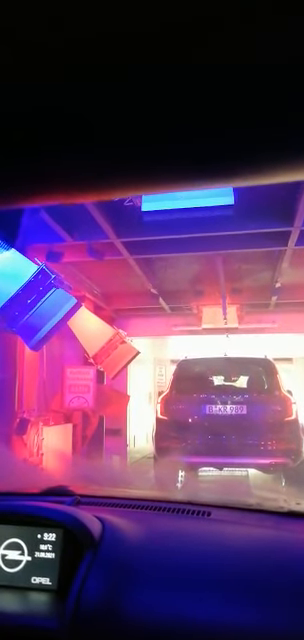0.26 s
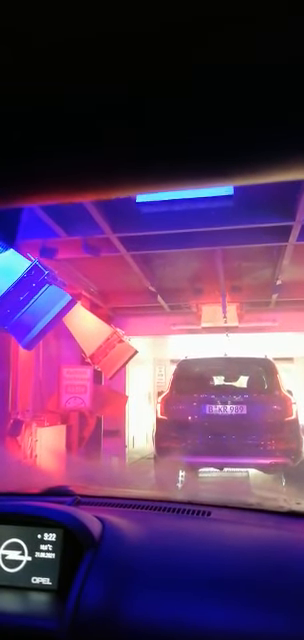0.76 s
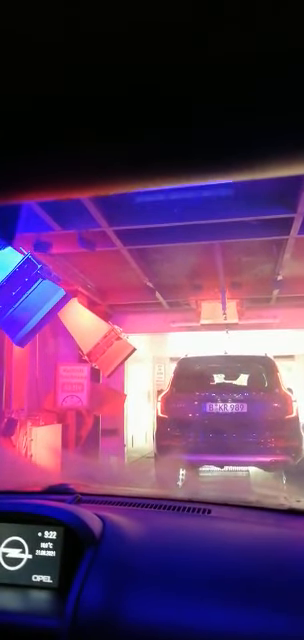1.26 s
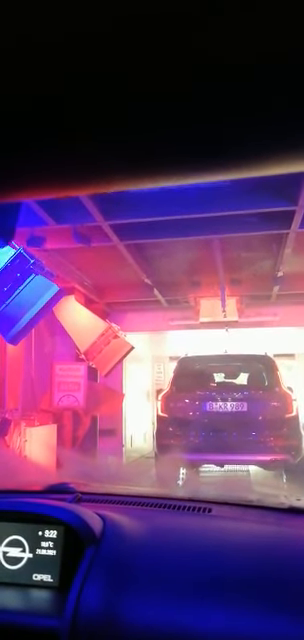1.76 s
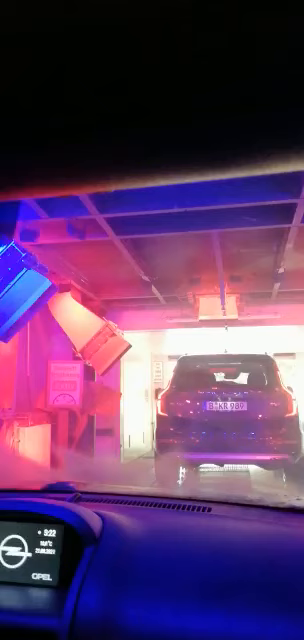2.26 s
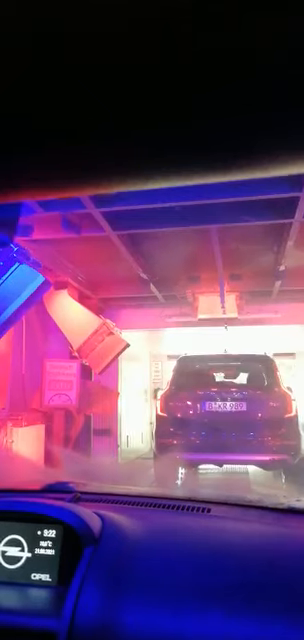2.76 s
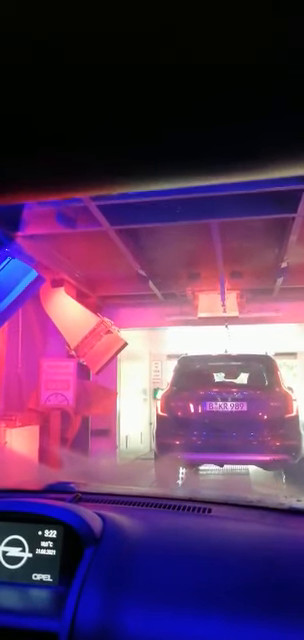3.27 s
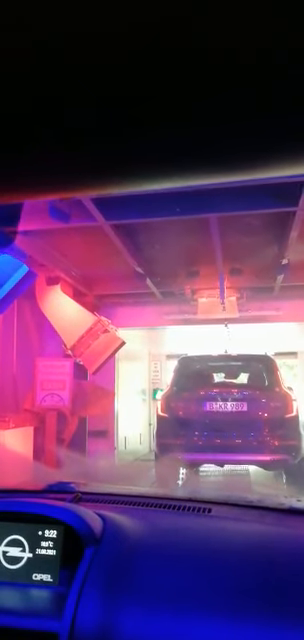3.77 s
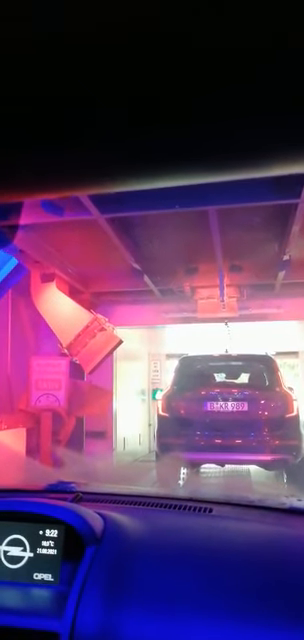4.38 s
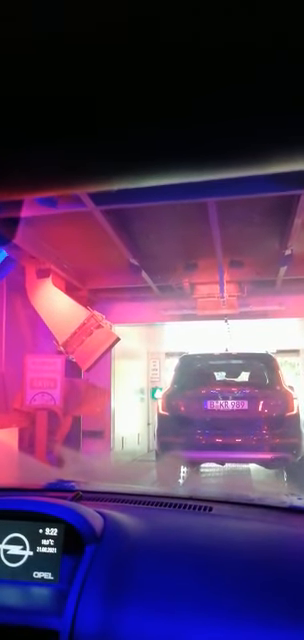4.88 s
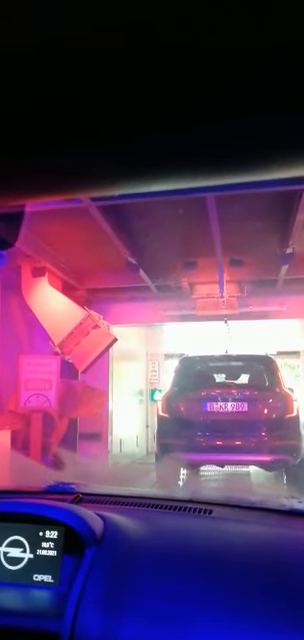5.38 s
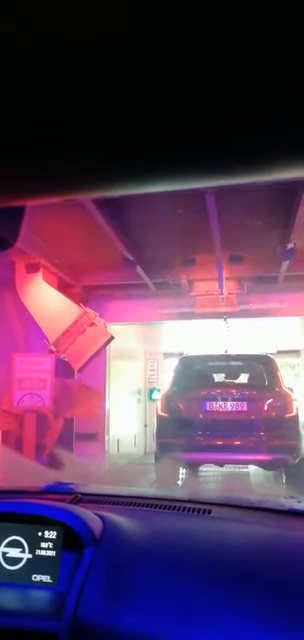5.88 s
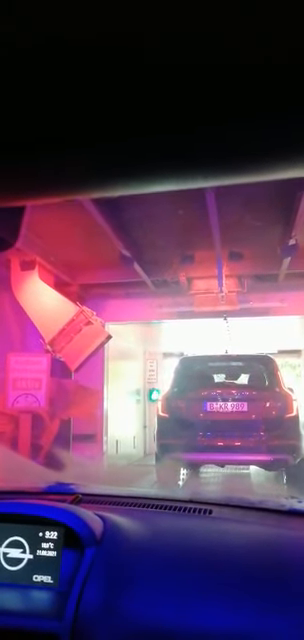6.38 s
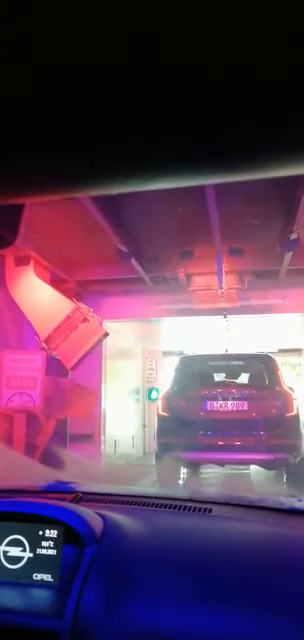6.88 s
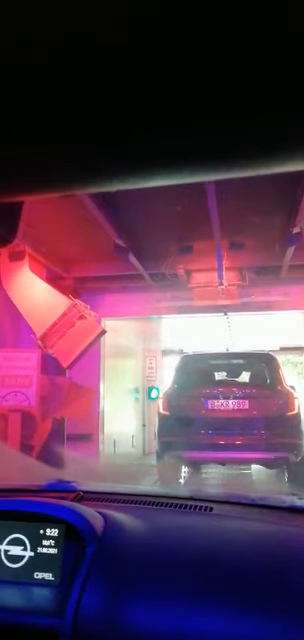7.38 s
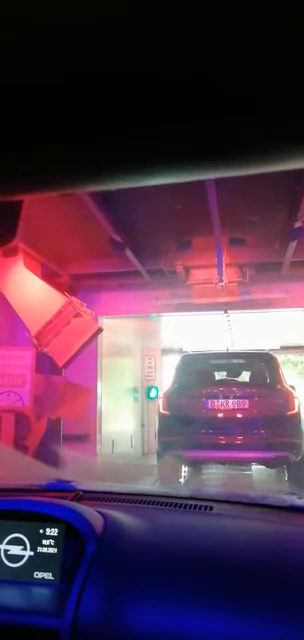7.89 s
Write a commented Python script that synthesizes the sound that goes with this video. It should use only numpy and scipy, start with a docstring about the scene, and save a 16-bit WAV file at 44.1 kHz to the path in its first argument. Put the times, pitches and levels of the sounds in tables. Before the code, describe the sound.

A dull, continuous rush of car wash blowers is heard from the cabin of a car creeping under the nozzles. A soft fan tone comes and goes as the air booms and drums ever harder on the panels, with hollow howls swelling and sinking. A quiet shower of bright ticks hits the windscreen midway, followed by a short, thin hiss of spray with airy whistling. The roar carries on throughout.

```python
"""Inside a car in a tunnel car wash, creeping under the nozzles of the dryer.
Big fans roar and hum through the closed windows. Their air jets howl on the bodywork,
buffet the panels more and more and make the cabin boom. Blown drops patter on the
windscreen and ring the glass, then a jet sweeps a sheet of fine spray across it,
hissing, sizzling and whistling."""
import sys
import numpy as np
from scipy import signal
from scipy.fft import rfft, irfft
from scipy.io import wavfile
from scipy.ndimage import uniform_filter1d, minimum_filter1d

SR = 44100
rng = np.random.default_rng(int(sys.argv[2]) if len(sys.argv) > 2 else 0)


def transcribe(signal):
    """Save signal, clipped to [-1, 1], as a 16-bit WAV file at the path in sys.argv[1]."""
    frames = np.atleast_2d(signal).T
    limited = np.clip(frames, -1, 1)
    pcm = np.round(limited * 32767).astype(np.int16)
    wavfile.write(sys.argv[1], SR, pcm)


N = 358091
TIME = np.arange(N) / SR


def gain_of(db):
    """Decibels as a gain."""
    return 10 ** (np.asarray(db) / 20)


def unit_rms(x):
    """Scales to rms 1."""
    return x / np.sqrt(np.mean(x ** 2) + 1e-20)


def summed_db(levels_db):
    """The level in dB of unrelated sounds heard at once."""
    return 10 * np.log10(sum(gain_of(db) ** 2 for db in levels_db) + 1e-20)


def swell(centre_s, db, half_s):
    """A bell-shaped fade; its half-length runs from the peak to half the gain."""
    return gain_of(db) * .5 ** (((TIME - centre_s) / half_s) ** 2)


def coloured(x, eq):
    """Shapes x with an EQ curve that rolls off steeply past its ends; rms 1."""
    eq_hz, eq_db = np.transpose(eq)
    hz = np.fft.rfftfreq(len(x), 1 / SR) + 1e-3
    roll_off = np.minimum(hz / eq_hz[0], 1) ** 2 * np.minimum(eq_hz[-1] / hz, 1) ** 2
    curve = gain_of(np.interp(np.log(hz), np.log(eq_hz), eq_db))
    return unit_rms(irfft(rfft(x) * roll_off * curve, len(x)))


def drift(rate_hz):
    """A slow random wobble, rms 1, up to about the given rate."""
    hz = np.fft.rfftfreq(N, 1 / SR)
    return unit_rms(irfft(rfft(rng.standard_normal(N)) * np.exp(-(hz / rate_hz) ** 2), N))


def flutter(depth_db, rate_hz):
    """A randomly wavering gain, rms 1."""
    return unit_rms(gain_of(depth_db * drift(rate_hz)))


def air(eq, gust_db, gust_hz):
    """Turbulent noise of one colour that flutters in strength."""
    return coloured(rng.standard_normal(N), eq) * flutter(gust_db, gust_hz)


def resonate(x, hz, width_hz):
    """A steady or gliding resonance: shift down to zero, smooth twice, shift back."""
    carrier = np.exp(2j * np.pi * np.cumsum(np.broadcast_to(hz, len(x))) / SR)
    pole = np.exp(-np.pi * width_hz / SR)
    smoothed = signal.lfilter([(1 - pole) ** 2], [1, -2 * pole, pole * pole], x / carrier)
    return unit_rms((carrier * smoothed).real)


def impacts(per_s, spread_db):
    """Random clicks of either sign, most of them small."""
    size = gain_of(spread_db * np.minimum(rng.exponential(1, N), 3))
    return size * rng.choice([-1, 1], N) * (rng.random(N) < per_s / SR)


# EQ for the dull roar through the glass and the thin hiss past the door seals.
# Each row: frequency in Hz, relative level in dB.
ROAR_EQ = [(60, -18.5), (130, -0.5), (210, -4.5), (270, -14.5), (370, -14), (560, -9), (800, -19),
           (1150, -25), (1600, -32.5), (2100, -38), (2700, -36.5), (3250, -40.5), (3750, -53), (4500, -71)]
SEAL_EQ = [(2500, -13), (3700, -5), (4500, -2.5), (5050, 3.5), (5800, 1), (6400, -5.5), (7000, -8),
           (7600, -19)]


def fan_roar(roar_db=-31, seal_db=-64.5, steady_above_hz=900):
    """The bed: blowers roar, fluttering low down and steadier on top, and air leaks past the seals."""
    roar = air(ROAR_EQ, gust_db=0.43, gust_hz=11)
    body = signal.sosfiltfilt(signal.butter(2, steady_above_hz, fs=SR, output="sos"), roar)
    treble = roar - body
    roar = treble + body * flutter(depth_db=1.48, rate_hz=5.1)
    leak = air(SEAL_EQ, gust_db=0.5, gust_hz=11)
    return gain_of(roar_db) * roar + gain_of(seal_db) * leak


# The steady hum, as levels in dB: first fan, second fan, their octaves, the second's third harmonic.
BLADE_LEVELS_DB = [-51.5, -56, -64.5, -63, -71]
# A tone blooms as the car crosses a loud spot in its sound field.
# Each row: centre in seconds, pitch in Hz (picks the nearest tone), level in dB, half-length in seconds.
BLADE_SWELLS = [(0.162, 583, -42.5, .08), (0.58, 583, -40, .27), (1.81, 583, -44, 0.061),
                (2.35, 583, -44, 0.14), (3.2, 583, -45, 0.16), (4.348, 583, -43.5, .2),
                (6.54, 583, -40, 0.15), (7.045, 583, -39, .1), (7.7, 583, -49, 0.14), (5.6, 526, -48, .2),
                (6.12, 526, -40, .09), (8.1, 526, -47, 0.6), (.1, 1053, -61, .16),
                (.97, 1053, -50.5, 0.071), (5, 1053, -52.5, 0.27), (6.75, 1053, -53, 0.45),
                (6.063, 1165, -53, 0.46), (6.908, 1579, -54.5, 0.26)]


def blade_tones(fans_hz=(582.6, 526.3), waver=0.002996, scatter=0.65, scatter_hz=8):
    """Two fans hum at their blade-passing pitch; tunnel echoes blur each tone, the higher ones more."""
    pitches = [hz * (1 + waver * drift(rate_hz=3.046)) for hz in fans_hz]
    first, second = (2 * np.pi * np.cumsum(hz) / SR for hz in pitches)
    partials = [(first, 1), (second, 1), (first, 2), (second, 2), (second, 3)]
    tone_hz = np.array([harmonic * phase[-1] / (2 * np.pi * TIME[-1]) for phase, harmonic in partials])
    powers = [gain_of(db) ** 2 for db in BLADE_LEVELS_DB]
    for centre_s, hz, db, half_s in BLADE_SWELLS:
        nearest = np.argmin(abs(tone_hz - hz))
        powers[nearest] = powers[nearest] + swell(centre_s, db, half_s) ** 2
    out = np.zeros(N)
    for (phase, harmonic), power in zip(partials, powers):
        echoes = harmonic * scatter * (drift(harmonic * scatter_hz) + 1j * drift(harmonic * scatter_hz))
        tone = ((1 + echoes) * np.exp(1j * harmonic * phase)).real
        out += np.sqrt(power) * unit_rms(tone)
    return out


# EQ for the cabin's sub boom, the rumbling panels and the rush over the windscreen.
# Each row: frequency in Hz, relative level in dB.
BOOM_EQ = [(10, -29.5), (17, -18), (23, 4.5), (36, 4.5), (46, -4), (56, -7.5), (64, -13.5), (90, -35)]
PANEL_EQ = [(40, -12), (60, -3.5), (75, -1), (105, 1.5), (140, -1), (165, -8.5), (220, -8), (300, -18.5),
            (390, -20.5), (520, -27.5), (750, -40.5), (1500, -56.5)]
RUSH_EQ = [(200, -13), (350, -6.5), (500, 0), (700, 8), (850, 3.5), (1100, -5.5), (1550, -14), (2000, -20),
           (2800, -35.5), (4000, -48.5)]
# Irregular swells and dips in the cabin boom and panel rumble.
# Each row: centre in seconds, boom lift in dB, panel lift in dB, half-length in seconds.
RUMBLE_SWELLS = [(0.907, 4.5, 4.5, 0.19), (1.72, 6.5, -3.5, 0.051), (1.95, 0, 3.5, 0.04),
                 (2.75, 0.5, 2, 0.46), (3.695, -2.5, -1, 0.052), (4.401, 0.5, 1.5, 0.65),
                 (5.166, -3.5, 2.5, .08), (5.36, 4.5, -0.5, 0.054), (5.508, -3.5, 2.5, 0.073),
                 (5.927, -7.5, 0.5, .08), (6.28, 1, 1.5, 0.22), (6.877, -1, -2, 0.042), (7.422, 4, 2, 0.11),
                 (7.597, -6.5, 3.5, 0.073), (7.95, 3, 0.5, 0.25)]


def air_jets(rush_end_s=7.42, rush_fade_db_per_s=16, drumming_db=-10.5):
    """The jets pump the cabin, shake the panels, rush over the windscreen and drum on the roof."""
    # Each layer fades up between two times in seconds as the car enters the jets, then holds.
    boom_db = np.interp(TIME, [-0.5, 2.5], [-33, -22.5])
    panels_db = np.interp(TIME, [1, 3.5], [-33.5, -23])
    rush_db = np.interp(TIME, [2.5, 5], [-47.5, -40])
    rush_db -= rush_fade_db_per_s * np.maximum(TIME - rush_end_s, 0)
    for centre_s, boom_lift_db, panel_lift_db, half_s in RUMBLE_SWELLS:
        bell = swell(centre_s, 0, half_s)
        boom_db += boom_lift_db * bell
        panels_db += panel_lift_db * bell
    pressure = air(BOOM_EQ, gust_db=-4.0, gust_hz=3.2)
    # The cabin's slow pressure swings keep a fairly even strength.
    running_rms = np.sqrt(uniform_filter1d(pressure ** 2, size=12000))
    boom = gain_of(boom_db) * unit_rms(pressure / running_rms)
    panels = gain_of(panels_db) * air(PANEL_EQ, gust_db=0.87, gust_hz=11)
    rush = gain_of(rush_db) * air(RUSH_EQ, gust_db=2, gust_hz=12)
    # The roof starts to drum as the car moves on under the nozzles.
    roof = resonate(rng.standard_normal(N), hz=255, width_hz=130)
    build_up = (TIME / TIME[-1]) ** 1.6
    drumming = build_up * gain_of(panels_db + drumming_db) * roof
    return boom + panels + rush + drumming


# A jet howls or drones as it meets the bodywork. Each row: centre in seconds, pitch in Hz,
# bandwidth in Hz, level in dB, upper resonance in dB against the lower, half-length in seconds.
JET_HOWLS = [(0, 371, 151, -40.5, -15.5, .4), (0.092, 987, 260, -48.5, -29.5, 0.77),
             (2.295, 385, 131, -41, -19, 0.62), (3.726, 369, 70, -40.5, -12.5, 0.26),
             (4.165, 381, 89.6, -38, -14, .17), (4.746, 185, 100.4, -28.5, -20.5, 0.32),
             (4.7, 315, 110, -37, -20, .3), (5.05, 815, 280, -40, -26.5, 0.36),
             (5.965, 510, 249, -36.5, -25.5, 0.27), (6.2, 61.8, 24, -30.5, -15.5, .6),
             (6.5, 235.6, 90, -35, -23.5, .45), (7.045, 437, 255, -34, -20, 0.41),
             (7.52, 345, 207, -35, -17, 0.43)]


def howls(upper_ratio=3.7, upper_width_hz=600, sag_octaves_per_s=0.19):
    """Two broad resonances of the airflow swell and sink in pitch as the car passes each nozzle."""
    out = np.zeros(N)
    for centre_s, pitch_hz, width_hz, db, upper_db, half_s in JET_HOWLS:
        span = abs(TIME - centre_s) < 3 * half_s
        hz = pitch_hz * 2 ** (-sag_octaves_per_s * (TIME[span] - centre_s))
        lower = resonate(rng.standard_normal(N)[span], hz, width_hz)
        upper = resonate(rng.standard_normal(N)[span], upper_ratio * hz, upper_width_hz)
        out[span] += swell(centre_s, db, half_s)[span] * (lower + gain_of(upper_db) * upper)
    return out


# EQ for the bright tick of glass under a drop. Each row: frequency in Hz, relative level in dB.
GLASS_EQ = [(3000, -45), (4800, -19.5), (5400, -10.5), (5650, 4), (5900, 2.5), (6030, -1), (6200, 3),
            (6450, -2), (6830, -6.5), (7000, -12), (7600, -30.5)]


def patter(full_s=3.945, hold_s=0.33, full_db=-57, rise_db_per_s=38, fall_db_per_s=8, stray_db=-77):
    """Small drops ring the glass: over a few strays, a shower swells fast, holds and slowly thins."""
    burst = np.exp(-np.arange(SR // 20) / SR / 0.0022)  # one tiny splash's energy
    hits = impacts(per_s=560, spread_db=2.5)
    energy = signal.oaconvolve(hits ** 2, burst)[:N]
    envelope = unit_rms(np.sqrt(np.abs(energy)))
    early_s = np.maximum(full_s - TIME, 0)
    late_s = np.maximum(TIME - full_s - hold_s, 0)
    shower_db = full_db - rise_db_per_s * early_s - fall_db_per_s * late_s
    middle = coloured(envelope * rng.standard_normal(N), GLASS_EQ)
    # The shower turns brighter as it reaches the rim of the glass.
    rim_ring = resonate(envelope * rng.standard_normal(N), hz=6600, width_hz=650)
    rim = swell(centre_s=4.58, db=-64.5, half_s=0.25) * coloured(rim_ring, GLASS_EQ)
    return gain_of(summed_db([shower_db, stray_db])) * middle + rim


def splash(start_s, peak_db, decay_s, attack_s=.0006, crest_db=8):
    """The envelope of water bursting on glass: it spreads at once, then dies away."""
    age_s = np.maximum(TIME - start_s, 0)
    energy = (1 - np.exp(-age_s / attack_s)) * np.exp(-np.minimum(age_s / decay_s, 60))
    return gain_of(peak_db - crest_db) * np.sqrt(energy)


# The fat drops that stand out of the patter.
# Each row: start in seconds, rough peak level in dB, energy decay in seconds, ring pitch in Hz.
LARGE_DROPS = [(1.2301, -50, .003, 6400), (3.5017, -46, .005, 5880), (3.537, -52.5, .009, 5730),
               (3.6577, -50, .011, 5790), (3.7684, -45, .004, 5880), (3.7944, -43, 0.0074, 5840),
               (3.822, -48, .012, 5840), (3.9053, -46, .016, 5880), (3.9685, -41, .003, 6120),
               (3.99, -38, .006, 5700), (4.0388, -41, .006, 5750), (4.0513, -38.5, .0056, 5700),
               (4.073, -43, .0046, 5710), (4.1047, -44, 0.0057, 6150), (4.1352, -40.5, 0.018, 5780),
               (4.186, -49, .006, 5930), (4.2149, -43, .004, 5650), (4.264, -46, 0.013, 5970),
               (4.2992, -46, .004, 6170), (4.3431, -41, .006, 5710), (4.3561, -45.5, .013, 5840),
               (4.4755, -41, .01, 5710), (4.5272, -36, .006, 5970), (4.5522, -42.5, .006, 5900),
               (4.6016, -44, .0083, 5790), (4.64, -44.5, 0.004, 6170), (4.7193, -41, 0.0079, 5860),
               (4.8445, -47, .004, 6190), (4.8809, -41.5, .005, 6000), (4.9105, -41, .005, 6030),
               (4.9832, -46, .004, 5900), (5.1165, -43.5, .0066, 6030), (5.155, -50, .011, 5850),
               (5.2027, -50, .011, 5650), (5.378, -53, .011, 5820), (5.4796, -50.5, .005, 5970)]


def large_drops(ring_width_hz=1100, ring_samples=SR // 5):
    """Each large drop rings the glass at its own pitch, set by where it lands."""
    out = np.zeros(N)
    for start_s, peak_db, decay_s, hz in LARGE_DROPS:
        onset = round(start_s * SR)
        span = slice(onset, onset + ring_samples)
        ring = resonate(rng.standard_normal(ring_samples), hz, ring_width_hz)
        out[span] += splash(start_s, peak_db, decay_s)[span] * coloured(ring, GLASS_EQ)
    return out


# EQ for the spray's wide hiss and fine sizzle. Each row: frequency in Hz, relative level in dB.
HISS_EQ = [(1200, -10), (2000, -7.5), (2500, -8), (2950, -2.5), (3330, -2), (3600, -13.5), (4400, -15),
           (6000, -22.5)]
SIZZLE_EQ = [(2500, -15.5), (3600, -9.5), (4000, -11.5), (4500, -10), (4750, -6.5), (5300, -1.5),
             (5850, -2), (6250, -6.5), (6850, -8), (7600, -23)]
# Passes of the spray over the glass.
# Each row: centre in seconds, hiss level in dB, sizzle level in dB, rise and fall in dB per second.
SPRAY_SWEEPS = [(6.25, -55, -62.5, 12.5), (6.92, -58, -54.5, 27), (6.975, -58.5, -57, 86)]
# Thicker spurts of water. Each row: start in seconds, rough peak level in dB, energy decay in seconds.
SPRAY_SPURTS = [(6.6061, -43, 0.012), (6.912, -43, .024), (6.9817, -48, .015), (7.1369, -47, 0.022),
                (7.3808, -42.5, 0.0074)]


def spray(on_s=5.94, off_s=7.31, edge_db_per_s=37, steady_hiss_db=-62, steady_sizzle_db=-65.5):
    """Dense tiny drops and mist; the hiss turns to a spurting sizzle as the jet crosses the glass."""
    hiss_levels, sizzle_levels = [steady_hiss_db], [steady_sizzle_db]
    for centre_s, hiss_db, sizzle_db, db_per_s in SPRAY_SWEEPS:
        away_db = db_per_s * abs(TIME - centre_s)
        hiss_levels.append(hiss_db - away_db)
        sizzle_levels.append(sizzle_db - away_db)
    # Before on_s and after off_s the jet misses the glass.
    on_glass = gain_of(-edge_db_per_s * abs(TIME - np.clip(TIME, on_s, off_s)))
    hiss_gain = on_glass * gain_of(summed_db(hiss_levels))
    sizzle_gain = on_glass * gain_of(summed_db(sizzle_levels))
    # Clicks for the drops, smooth noise for the mist.
    coarse = unit_rms(impacts(per_s=780, spread_db=7.5)) + 0.95 * rng.standard_normal(N)
    fine = unit_rms(impacts(per_s=2400, spread_db=4)) + 0.7 * rng.standard_normal(N)
    hiss = hiss_gain * coloured(coarse, HISS_EQ) * flutter(depth_db=1, rate_hz=35)
    sheet_power = (sizzle_gain * flutter(depth_db=1.4, rate_hz=30)) ** 2
    spurt_power = sum(splash(*spurt) ** 2 for spurt in SPRAY_SPURTS)
    sizzle = np.sqrt(sheet_power + spurt_power) * coloured(fine, SIZZLE_EQ)
    return hiss + sizzle


# Whistles that come and go with the spray.
# Each row: centre in seconds, pitch in Hz, bandwidth in Hz, level in dB, half-length in seconds.
EDGE_WHISTLES = [(5.977, 3050, 420, -60, .13), (6.21, 3290, 260, -61.5, 0.17), (6.37, 3020, 330, -56, .1),
                 (6.678, 3200, 450, -58.5, 0.17), (7.15, 2720, 350, -61, .25),
                 (6.241, 5390, 170, -63.5, .24), (6.765, 5520, 340, -59, 0.076),
                 (7.03, 5400, 380, -59, .08)]


def whistles(wander=0.007):
    """Air skimming a wet edge sings with a fuzzy, wandering pitch."""
    out = np.zeros(N)
    for centre_s, pitch_hz, width_hz, db, half_s in EDGE_WHISTLES:
        breath = rng.standard_normal(N)
        hz = pitch_hz * (1 + wander * drift(rate_hz=11))
        out += swell(centre_s, db, half_s) * resonate(breath, hz, width_hz)
    return out


# The boxy colour of the cabin. Each row: frequency in Hz, bandwidth in Hz, boost or cut in dB.
CABIN_MODES = [(72, 7.6, 3.5), (157, 13, 2.5), (160.5, 6.2, -4), (379.5, 22, 3.5), (420, 99, -1.5),
               (473, 23, 3), (629, 33, -4.5), (658, 30, 1), (2100, 380, -1), (2500, 120, 2)]


def cabin(x):
    """Standing waves in the cabin lift some frequencies and hollow out others."""
    hz = np.fft.rfftfreq(N, 1 / SR)
    db = sum(boost / (1 + (2 * (hz - centre) / width) ** 2) for centre, width, boost in CABIN_MODES)
    return irfft(rfft(x) * gain_of(db), N)


def scene():
    """The mono mix of air and water, heard through the cabin."""
    dryer = fan_roar() + blade_tones() + air_jets() + howls()
    water = patter() + large_drops() + spray() + whistles()
    return cabin(dryer + water)[None]


def record(dry, ceiling=0.58, cutoff_hz=7580):
    """A limiter holds down the largest swings, then a steep low-pass takes off the top."""
    allowed_gain = np.minimum(1, ceiling / (np.abs(dry) + 1e-9))
    limiter_gain = uniform_filter1d(minimum_filter1d(allowed_gain, size=300), size=280)
    end_fades = signal.windows.tukey(N, .0006)
    low_pass = signal.firwin(301, cutoff_hz, window=("kaiser", 9), fs=SR)
    return signal.oaconvolve(dry * limiter_gain * end_fades, low_pass[None], "same")


dry = scene()
out = record(dry)
transcribe(out)
```